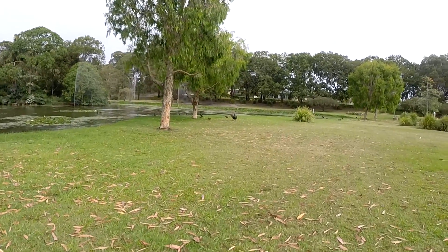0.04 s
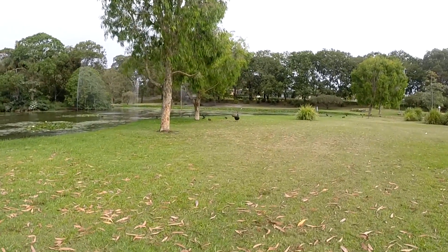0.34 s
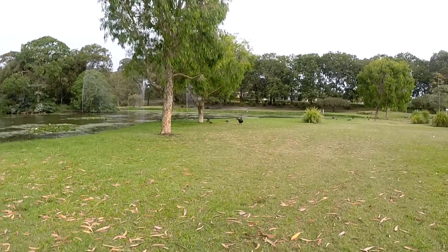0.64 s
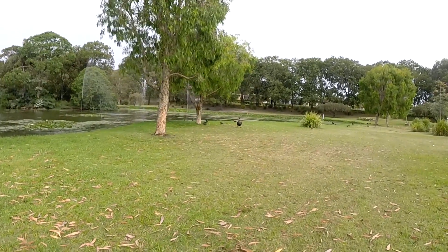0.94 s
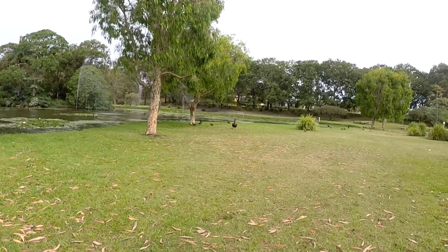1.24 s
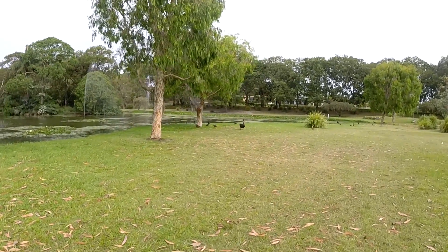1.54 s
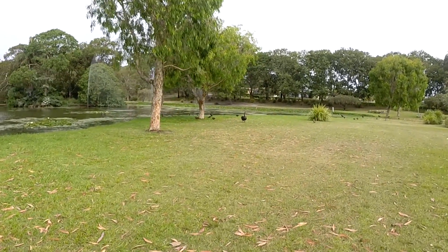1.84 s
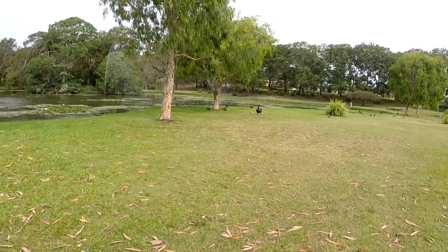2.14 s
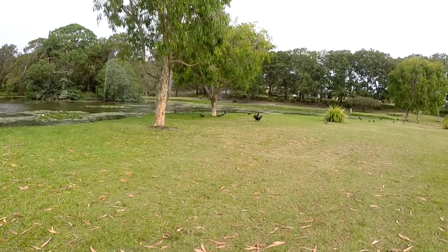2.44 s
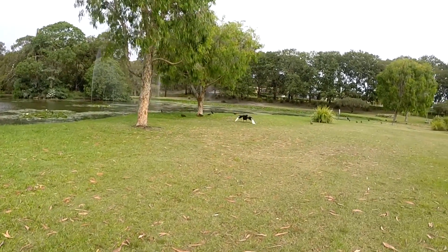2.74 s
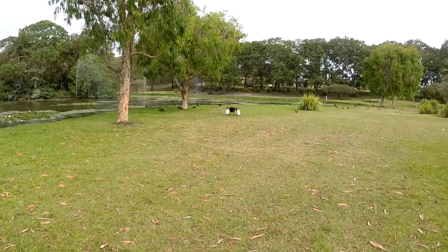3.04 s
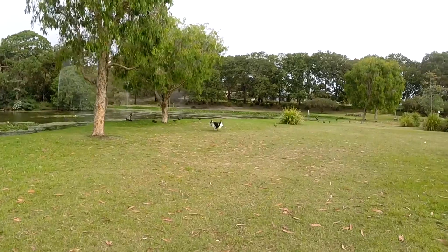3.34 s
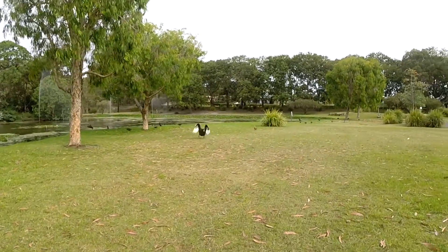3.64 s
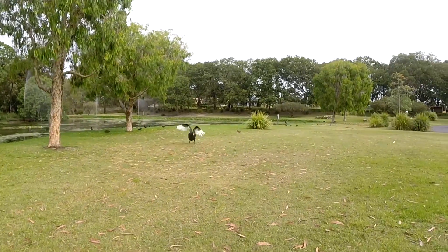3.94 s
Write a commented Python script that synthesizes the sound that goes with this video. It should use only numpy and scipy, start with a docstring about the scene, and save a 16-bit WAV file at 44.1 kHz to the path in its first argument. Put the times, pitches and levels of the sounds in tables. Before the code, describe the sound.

Low wind buffeting over slow footsteps on grass, cracking twigs and faraway bird calls.

```python
"""Wind buffets the microphone and a small metal tag jingles on a slow walk over a leaf-strewn lawn.
Shoes brush the grass in countless tiny impacts, twigs snap in damped vibrations, dry leaves tick
and a hand knocks on the camera. Parrots screech with the two voices of the syrinx and whistle,
their calls scattered by the trees. A water bird honks far off on the pond, over the chatter of a
distant flock and the hush of the park."""
import sys
import numpy as np
from scipy import signal
from scipy.fft import rfft, irfft, next_fast_len
from scipy.io import wavfile
from scipy.ndimage import uniform_filter1d, map_coordinates

SR = 44100
rng = np.random.default_rng(int(sys.argv[2]) if len(sys.argv) > 2 else 0)


def master(y):
    """Save y as 16-bit WAV."""
    cut = np.clip(np.atleast_2d(y).T, -1, 1)
    pcm = np.round(cut * 32767)  # scale
    wavfile.write(sys.argv[1], SR, pcm.astype(np.int16))


N = 176400


def footsteps():
    """Superposed random impacts: blades and leaves flick against each shoe and merge into a swish."""
    # Each row: centre in seconds, length in seconds, level in dB.
    strides = [(.255, 0.042, -47), (.61, 0.096, -44.5), (1.35, 0.091, -51), (1.89, 0.02, -44),
               (2.05, 0.22, -51), (2.73, 0.17, -51), (3.01, 0.028, -52), (3.31, 0.27, -56),
               (3.71, 0.067, -54.5), (3.975, 0.072, -47)]
    # Spectrum of brushed grass. Each row: frequency in Hz, gain in dB.
    grass = [(200, -30), (600, -6.5), (1050, 3), (1600, -9.5), (3000, -12.5), (5800, -12.5), (8000, -18.5),
             (9500, -29.5), (11000, -24.5), (15000, -45)]
    grains_per_s, spread_db, floor_db = 2500, 4, -58
    grains = (rng.random(N) < grains_per_s / SR) * rng.choice([-1, 1], N)
    strength = amp(spread_db * np.minimum(rng.exponential(size=N), 4))
    return (swells(strides) + amp(floor_db)) * coloured(grains * strength, grass)


def twig_snaps():
    """Brittle fracture excites damped modes: a crack with an overtone, a duller thud, and splinters."""
    # Each row: start in seconds, gain in dB, crack pitch in Hz, its t60 in seconds, thud pitch in Hz,
    # thud and splinter levels in dB relative to the crack.
    fractures = [(.624, -25, 3700, 0.0031, 1300, 3, -14), (.7025, -33.5, 1900, 0.003, 1110, 15.5, -10),
                 (.9145, -21.5, 3870, 0.0017, 1180, -2, -24), (1.404, -34, 2620, 0.0033, 1200, -11, -2.5),
                 (1.4367, -12.5, 2200, 0.0025, 1710, -35, -23), (1.543, -32, 3050, 0.0031, 1500, -18, -17),
                 (1.875, -33, 2600, 0.0021, 1060, 7, -17), (1.9402, -17.5, 4100, 0.0034, 1490, -1.5, -14.5),
                 (2.008, -38, 1720, 0.0023, 900, 18, -19), (2.0673, -16, 4360, 0.0073, 1610, -1.5, -16.5),
                 (2.083, -26, 2660, .005, 1200, -15, -10.5), (2.788, -35, 1600, 0.0016, 1044, 13.5, -18)]
    # Spectrum of splintering. Each row: frequency in Hz, gain in dB.
    splinter_colour = [(500, 9), (1200, 9), (6800, -2), (9000, -1)]
    # The lower and upper edge of the snaps' band in Hz.
    band_hz = [620, 4800]
    out, t = np.zeros(N), np.arange(SR // 20) / SR
    noise = coloured(rng.standard_normal(N), splinter_colour)
    attack = 1 - np.exp(-t / 0.000077)
    for k, (start, db, hz, t60, thud_hz, thud_db, splinter_db) in enumerate(fractures):
        crack = ring(t, hz, t60) + amp(-15) * ring(t, 1.45 * hz, t60=0.013)
        thud = amp(thud_db) * ring(t, thud_hz, t60=0.0033)
        splinters = amp(splinter_db) * noise[k * len(t):][:len(t)] * np.exp(-t / 0.0048)
        add(out, start, amp(db) * (crack + thud + splinters) * attack)
    return signal.sosfilt(signal.butter(2, band_hz, "bandpass", fs=SR, output="sos"), out)


def leaf_ticks():
    """A brief impulse has a broad spectrum: brittle leaves tick brightly underfoot."""
    # Each row: start in seconds, level in dB.
    ticks = [(1.331, -37), (2.025, -34), (2.0678, -27.5), (3.585, -38.5), (3.606, -39.5), (3.687, -42)]
    envelope, t = np.zeros(N), np.arange(SR // 50) / SR
    for start, db in ticks:
        add(envelope, start, amp(db) * np.exp(-t / 0.0012))
    return envelope * coloured(rng.standard_normal(N), [(3000, -5), (6200, 10), (15000, -28.5)])


def metal_tag():
    """Free vibration of a struck plate: two main modes beat against each other over a scratchy tick."""
    # Each row: start in seconds, gain in dB, lean in dB (added to the upper mode, taken off the lower).
    touches = [(0.046, -41, -1), (.0985, -37.5, -4), (.1262, -39, 1), (0.1505, -35.5, -12.5),
               (0.2882, -39.5, 15), (0.3174, -38.5, 4), (0.8087, -43, 0), (3.464, -51, -5)]
    # The lower and upper main mode in Hz.
    main_hz = [12170, 12880]
    # Further modes. Each row: frequency in Hz, relative level in dB, t60 in seconds.
    side_modes = [(7400, 2, 0.018), (7340, 2, 0.038), (13600, -13, 0.015)]
    # Spectrum of the contact. Each row: frequency in Hz, gain in dB.
    tick_colour = [(3000, 0), (7000, 13), (9500, -2), (12500, 12), (15000, -22)]
    scatter_db, main_t60_s = 1.5, .017
    out, t = np.zeros(N), np.arange(SR // 10) / SR
    noise = coloured(rng.standard_normal(N), tick_colour)
    attack = 1 - np.exp(-t / 0.00067)
    for k, (start, db, lean_db) in enumerate(touches):
        modes = sum(amp(level + rng.normal(0, scatter_db)) * ring(t, hz, t60)
                    for hz, level, t60 in side_modes)
        modes += amp(-lean_db) * ring(t, main_hz[0], main_t60_s)
        modes += amp(lean_db) * ring(t, main_hz[1], main_t60_s)
        tick = amp(9.5) * noise[k * len(t):][:len(t)] * np.exp(-t / 0.0022)
        add(out, start, amp(db - 9) * (modes + tick) * attack)
    return out


def parrot_screeches():
    """Biphonation: two hiss-edged voices of the syrinx each jump chaotically in pitch and strength."""
    # Each row: start and length in seconds, upper voice in Hz, its level in dB, lower voice in Hz,
    # its level in dB, its glide in Hz.
    calls = [(1.655, 0.11, 5260, -41.5, 3810, -53, 187), (1.912, 0.078, 5050, -45, 3690, -49.5, -200),
             (2.12, .11, 5290, -45.5, 4000, -48.5, 398), (2.355, 0.096, 4985, -38, 3684, -43, -700),
             (2.665, 0.108, 5030, -42, 3790, -51, -150), (3.26, 0.083, 6110, -51.5, 3970, -51, 109),
             (3.928, 0.069, 5100, -47.5, 3550, -46, 107)]
    # Spectrum of the hiss. Each row: frequency in Hz, gain in dB.
    hiss_colour = [(3500, -5), (6700, 6), (7400, -7.5), (8400, 1), (9300, -9), (10200, -9.5), (12000, -25),
                   (15000, -40)]
    attack_s, release_s = .02, .022
    rasp_share, waver_share, rasp_db = .057, .026, 4
    out, t = np.zeros(N), np.arange(SR // 4) / SR
    hiss = amp(-17.5) * coloured(rng.standard_normal(N), hiss_colour)
    for k, (start, length, upper_hz, upper_db, lower_hz, lower_db, glide_hz) in enumerate(calls):
        gate = np.clip(t / attack_s, 0, 1) * np.clip((length - t) / release_s + .5, 0, 1)
        edge = hiss[k * len(t):][:len(t)]
        gliding_hz = lower_hz + glide_hz * (t / length - .5)
        for hz, db in (upper_hz, upper_db), (gliding_hz, lower_db):
            pitch = hz * (1 + rasp_share * wobble(1100, len(t)) + waver_share * wobble(220, len(t)))
            phase = 2 * np.pi * np.cumsum(pitch) / SR
            voice = np.sin(phase) + amp(-28) * np.sin(2 * phase) + edge
            flutter = amp(rasp_db * np.tanh(wobble(278, len(t))))
            add(out, start, amp(db) * gate * unit(voice * flutter))
    return out


def parrot_whistles():
    """Frequency glides: each whistle is a sliding tone with a weaker partial an octave below."""
    # Each row: start and length in seconds, first, middle and last pitch in Hz, level in dB,
    # roughness as a share of pitch.
    calls = [(1.065, 0.13, 5150, 5560, 5310, -53.5, .036), (1.24, 0.081, 4500, 5400, 5720, -53.5, 0.022),
             (1.31, 0.045, 5930, 6010, 6100, -53.5, .008), (1.425, 0.035, 5160, 5370, 5200, -46.5, .012),
             (1.465, 0.04, 5600, 6120, 5950, -59, 0.0092), (1.555, 0.11, 4060, 4200, 4250, -61, .006),
             (1.637, 0.033, 3460, 3800, 4130, -53, 0.021), (2.175, 0.035, 1980, 2180, 2420, -55.5, .015),
             (2.24, .07, 5350, 5370, 5240, -49, 0.036), (3.05, 0.085, 4720, 4640, 4200, -60, .01),
             (2.632, 0.034, 3240, 3450, 3830, -46.5, 0.049), (2.803, 0.0395, 3290, 3470, 3800, -48, 0.021),
             (3.075, 0.145, 5330, 5680, 6080, -56.5, .007), (3.163, 0.02, 5280, 4780, 4200, -52, .012),
             (3.872, 0.03, 4850, 4160, 5030, -44, .014)]
    # Each row: multiple of the strongest partial's frequency, relative level in dB.
    partials = [(.5, -9), (1, 0)]
    return gliding_notes(calls, partials)


def water_bird_honks():
    """A harmonic series with an unsteady fundamental sounds as a hoarse honk."""
    # Each row: start and length in seconds, first, middle and last pitch in Hz, level in dB.
    calls = [(1.669, 0.12, 990, 1130, 1063, -50.5), (1.871, 0.093, 1086, 1000, 880, -49),
             (2.339, 0.047, 977, 960, 895, -44.5), (2.598, 0.039, 1045, 1067, 1103, -43.5),
             (2.669, 0.076, 1082, 999, 1007, -49), (2.747, 0.11, 982, 990, 1010, -51)]
    # Each row: harmonic number, relative level in dB.
    harmonics = [(1, -4), (2, -19), (3, -18), (4, -7.5)]
    roughness = .028  # share of pitch
    return gliding_notes([(*call, roughness) for call in calls], harmonics)


def gliding_notes(calls, partials):
    """Random frequency and amplitude modulation roughen notes that glide, swell and fade."""
    rasp_hz, flutter_hz, flutter_db = 550, 184, 3
    out = np.zeros(N)
    for start, length, first_hz, middle_hz, last_hz, db, roughness in calls:
        progress = np.linspace(0, 1, int(length * SR))
        glide = np.polyval(np.polyfit([0, .5, 1], [first_hz, middle_hz, last_hz], 2), progress)
        pitch = glide * (1 + roughness * wobble(rasp_hz, len(progress)))
        phase = 2 * np.pi * np.cumsum(pitch) / SR
        voice = sum(amp(level) * np.sin(k * phase) for k, level in partials)
        flutter = amp(flutter_db * wobble(flutter_hz, len(progress)))
        arch = np.sqrt(np.abs(np.sin(np.pi * progress)))
        add(out, start, amp(db) * unit(voice * flutter * arch))
    return out


def hand_knocks():
    """Structure-borne sound: the hand bumps the camera body, each dull knock in its own band."""
    # Each row: centre in seconds, length in seconds, level in dB, pitch in Hz.
    knocks = [(0.063, 0.018, -34, 228), (0.081, 0.033, -42, 337), (0.233, 0.014, -33, 185),
              (0.241, 0.032, -44, 360), (3.786, 0.027, -40, 195), (3.99, 0.026, -38, 280)]
    width_octaves = 0.39
    out = np.zeros(N)
    for centre, length, db, hz in knocks:
        body = filtered(rng.standard_normal(N),
                        lambda f: np.exp(-.5 * (np.log2((f + 1) / hz) / width_octaves) ** 2))
        out += swells([(centre, length, db)]) * evened(body)
    return out


def wind():
    """Turbulent pressure at the microphone makes a low rumble with single buffets on top."""
    # Strength of the rumble. Each row: time in seconds, level in dB.
    strength = [(0, -27), (.28, -31), (.4, -41), (1.8, -41), (1.95, -49), (2.45, -44), (2.8, -41),
                (3.3, -43.5), (3.6, -49.5), (3.85, -45), (4, -27)]
    # Each row: centre in seconds, length in seconds, level in dB.
    buffets = [(.05, 0.11, -26), (.245, 0.02, -27.5), (.43, 0.035, -31.5), (.59, 0.034, -31.5),
               (.73, 0.0082, -28.5), (.82, 0.041, -33.5), (1.0, 0.061, -30), (1.255, 0.068, -31),
               (1.658, 0.021, -31.5), (1.76, 0.036, -43), (2.44, 0.1, -35.5), (3.372, 0.018, -29),
               (3.94, 0.062, -30), (3.995, 0.012, -19.5)]
    # Spectra of the rumble and the buffets. Each row: frequency in Hz, gain in dB.
    rumble_colour = [(15, -11), (30, -0.5), (65, 1), (100, -7.5), (160, -10.5), (300, -23.5), (600, -39),
                     (1500, -54), (5000, -120)]
    buffet_colour = [(15, -48), (35, 9), (65, 1.5), (110, -7), (330, -27.5), (1500, -73), (5000, -120)]
    rumble = amp(curve(strength)) * coloured(rng.standard_normal(N), rumble_colour)
    return rumble + swells(buffets) * evened(coloured(rng.standard_normal(N), buffet_colour))


def far_flock():
    """Incoherent summation: many distant parrots merge into noise, patchy in time and frequency."""
    # Strength of the chatter. Each row: time in seconds, level in dB.
    strength = [(0, -52.5), (.35, -58.5), (.5, -57.5), (1.55, -55.5), (1.85, -50.5), (2.3, -50),
                (2.55, -53.5), (2.85, -52.5), (3.1, -57.5), (3.5, -54.5), (3.8, -54.5), (4, -42)]
    # Its spectrum. Each row: frequency in Hz, gain in dB.
    colour = [(1800, -3.5), (2800, -9), (3600, 1.5), (4500, -4), (5400, -4), (6400, -9.5), (8500, -15.5),
              (12000, -39)]
    patch_db = 3
    spectrogram = signal.stft(rng.standard_normal(N), nperseg=512)[2]
    patches = uniform_filter1d(rng.standard_normal(spectrogram.shape), size=4, axis=0)
    patches = unit(uniform_filter1d(patches, size=8, axis=1))
    chatter = signal.istft(spectrogram * amp(patch_db * patches), nperseg=512)[1][:N]
    return amp(curve(strength)) * coloured(chatter, colour)


def tree_echoes(x, echo_db, t60):
    """Scattering from leaves, trunks and crowns adds an exponentially decaying tail."""
    t = np.arange(SR) / SR
    tail = rng.standard_normal(SR) * np.exp(-np.log(1000) * t / t60)
    echoes = signal.fftconvolve(x, tail / np.linalg.norm(tail))[:N]
    return (x + amp(echo_db) * echoes) / np.hypot(1, amp(echo_db))


def park_hush():
    """Stationary noise: the distant background of the park is a steady hush."""
    # Each row: frequency in Hz, gain in dB.
    colour = [(60, -3), (393, -14.5), (667, -17.5), (986, -10.5), (1400, -35), (2000, -23), (2700, -35.5),
              (3600, -54), (6400, -38), (9500, -43), (15000, -52)]
    return amp(-49) * coloured(rng.standard_normal(N), colour)


def amp(db):
    """Decibels to gain."""
    return 10 ** (np.asarray(db) / 20)


def unit(x):
    """Normalisation to rms 1."""
    return x / np.sqrt(np.mean(x ** 2) + 1e-20)


def curve(rows):
    """Linear interpolation between (seconds, value) points."""
    return np.interp(np.arange(N) / SR, *np.transpose(rows))


def wobble(rate, size):
    """A smooth random curve with rate knots a second."""
    return map_coordinates(rng.standard_normal(8192), [np.arange(size) * rate / SR], mode="wrap")


def filtered(x, response):
    """Filtering multiplies the spectrum by a response of frequency."""
    size = next_fast_len(N + SR // 2)
    return irfft(rfft(x, size) * response(np.fft.rfftfreq(size, 1 / SR)), size)[:N]


def coloured(x, points):
    """Spectral shaping by (Hz, dB) points, at rms 1."""
    hz, db = np.transpose(points)
    return unit(filtered(x, lambda f: amp(np.interp(np.log(f + 1), np.log(hz), db))))


def evened(x):
    """Division by the smoothed envelope takes out slow swings of level, at rms 1."""
    power = uniform_filter1d(np.abs(signal.hilbert(x)) ** 2, size=1200)
    return unit(x / np.sqrt(np.abs(power)))


def swells(rows):
    """Gaussian swells add in power to form one amplitude envelope."""
    t = np.arange(N) / SR
    return np.sqrt(sum(amp(2 * db) * np.exp(-np.minimum((2 * (t - centre) / length) ** 2, 100))
                       for centre, length, db in rows))


def ring(t, hz, t60):
    """A damped mode falls by 60 dB in t60 seconds."""
    return np.sin(2 * np.pi * hz * t) * np.exp(-np.log(1000) * t / t60)


def add(track, start, sound):
    """Mix a sound into a track at a start in seconds."""
    part = track[max(round(start * SR), 0):][:len(sound)]
    part += sound[:len(part)]


def scene():
    """Superposition of the birds among the trees, the walker close by, the wind and the park's hush."""
    trees_t60_s = 0.54
    whistles = parrot_whistles()
    screeches = tree_echoes(parrot_screeches(), echo_db=-2, t60=.02)  # brief scatter from leaves
    birds = tree_echoes(screeches + water_bird_honks(), echo_db=-7, t60=trees_t60_s)
    birds += tree_echoes(whistles, echo_db=-4.5, t60=trees_t60_s)
    background = far_flock() + park_hush()
    walker = footsteps() + twig_snaps() + leaf_ticks() + metal_tag() + hand_knocks()
    return (walker + birds + wind() + background)[None]


def record(dry):
    """Band limiting: the camera passes nothing above its cutoff."""
    cutoff_hz = 15400
    return filtered(dry[0], lambda hz: hz < cutoff_hz)[None]


dry = scene()
out = record(dry)
master(out)
```